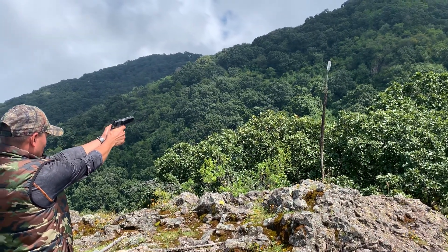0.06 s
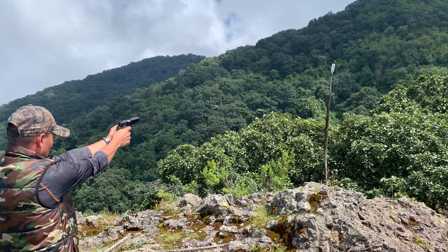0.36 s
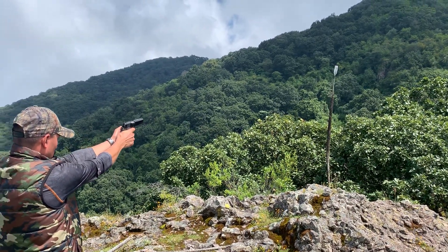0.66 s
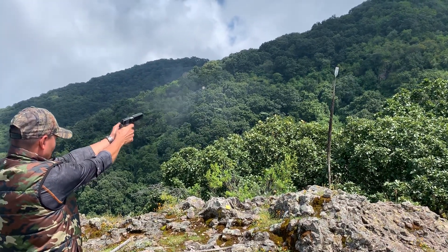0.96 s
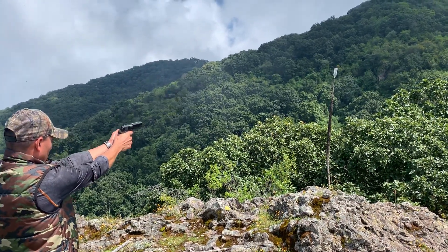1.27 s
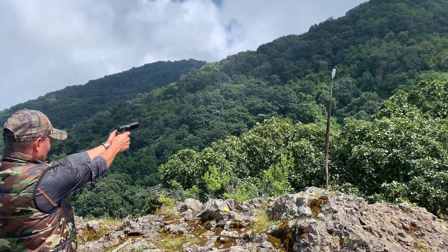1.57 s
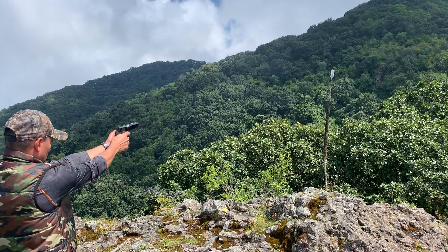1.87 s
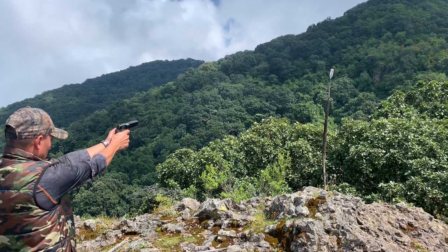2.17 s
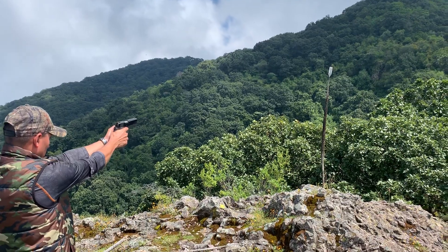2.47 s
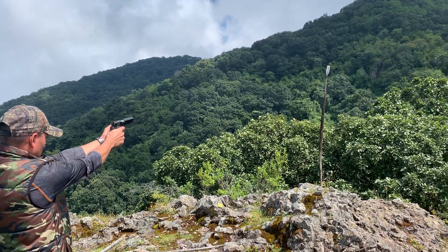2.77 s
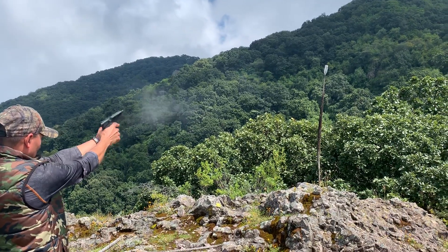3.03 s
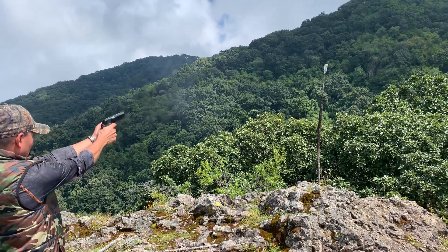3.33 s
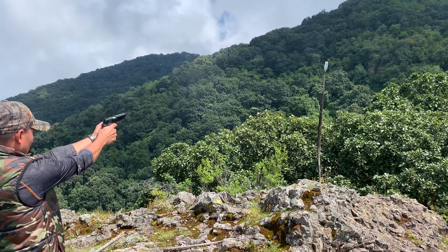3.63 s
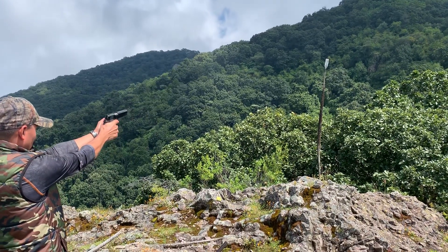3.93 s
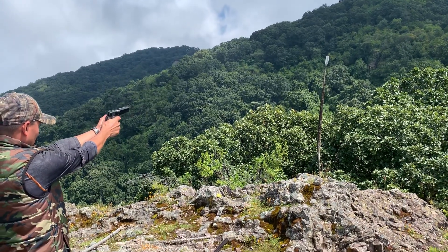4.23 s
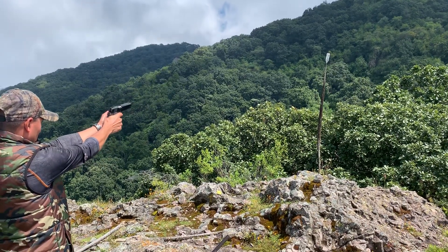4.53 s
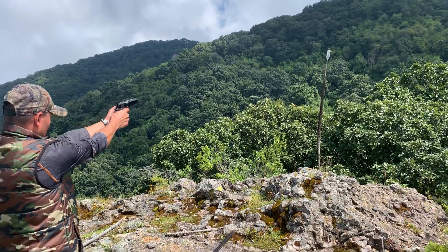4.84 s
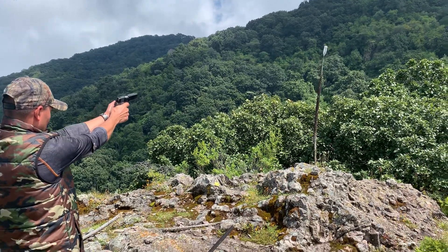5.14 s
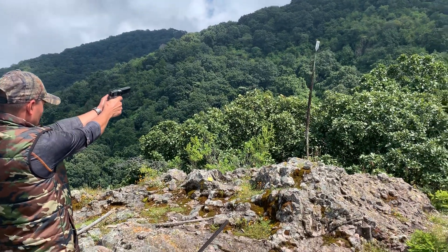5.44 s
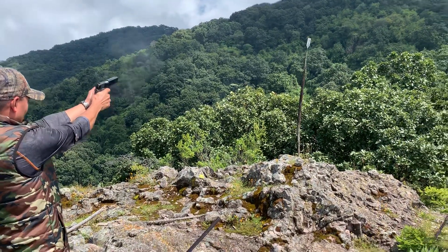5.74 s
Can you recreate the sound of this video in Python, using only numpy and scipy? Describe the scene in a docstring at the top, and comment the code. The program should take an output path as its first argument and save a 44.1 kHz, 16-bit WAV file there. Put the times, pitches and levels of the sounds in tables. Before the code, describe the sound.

Three sharp pistol shots, a couple of seconds apart, crack outdoors and echo away along wooded mountain slopes.

```python
"""Three pistol shots from a rocky ledge above a wooded valley, heard by a small two-port microphone.
Each muzzle blast is doubled by the rocks; the slide slams shut, the near trees wash the sound back,
then it rolls along the far hillside. The roll of an earlier shot is still fading at the start.
Behind: clicks of the pistol in the hands, a rustle, far knocks, valley hush, light wind on the microphone."""
import sys
import numpy as np
from scipy import signal
from scipy.fft import rfft, irfft, next_fast_len
from scipy.io import wavfile
from scipy.ndimage import uniform_filter1d

SR = 44100
rng = np.random.default_rng(int(sys.argv[2]) if len(sys.argv) > 2 else 0)


def inscribe(sig):
    """Save sig as 16-bit PCM at rate SR to the path in sys.argv[1].

    A 1-D sig is mono; a 2-D sig holds one channel per row.
    Samples are clipped to [-1, 1] before scaling.
    """
    pcm = np.round(np.clip(np.atleast_2d(sig).T, -1, 1) * 32767)
    wavfile.write(sys.argv[1], SR, pcm.astype(np.int16))


N = 264600
PREROLL_S = .06
EVENT_TIME_S = np.arange(3 * SR) / SR - PREROLL_S

# (time [s], blast gain [dB], slide [dB], near wash gain [dB], rumble [dB], roll gain [dB], roll stretch [x])
SHOTS = [(-2.15, -1.0, -20, 0, -40, -1.3, .97), (.8695, -.3, -13, .8, -38, 0, .99),
         (3.0245, -.1, -6, -1.8, -48, .3, 1.02), (5.5780, 0.2, -14, .7, -40, 0.1, 1.0)]
# per shot, blast and rock throwback: (delay [s], rise [s], fall [s], crack [dB], boom [dB], boom lag [s],
# boom rise [s], knock [dB], knock pitch [Hz], knock lag [s])
BLASTS = [
    [],
    [(0, .0022, .005, -9, -12, 0, .0042, -8, 560, .002),
     (.0265, .005, .009, -9.3, -10.3, .006, .008, -8, 780, .0105)],
    [(0, .0028, .006, -9, -11.5, .001, .006, -9, 450, .0055),
     (.0275, .0042, .0075, -7.5, -9.7, .0085, .0065, -6, 760, .0105)],
    [(0, .0034, .0058, -9, -12, .002, .0075, -8, 600, .0035),
     (.028, .005, .0085, -10.5, -11.3, .008, .009, -7.5, 680, .008)],
]
# per shot, colour as the aim shifts: (centre [Hz], width [Hz], gain [dB])
BLAST_RESONANCES = [
    [],
    [(150, 70, -4), (382, 70, 2.5), (530, 90, -3), (880, 50, -2), (1720, 100, 3), (1920, 80, -5),
     (2040, 70, 7), (3180, 50, 3), (3450, 200, -4), (4680, 250, 2), (6700, 500, -4), (8200, 600, -3)],
    [(290, 50, -3), (405, 100, 3), (540, 70, -4), (880, 50, -3), (770, 100, 1.5), (958, 70, 3),
     (1200, 160, 2.5), (1560, 150, -4), (1860, 140, -7), (2040, 70, 5), (2480, 120, 2), (3190, 50, 3),
     (4400, 250, 3), (5800, 600, -4), (10800, 1800, 3)],
    [(335, 40, 2), (580, 70, 4), (725, 100, 3), (830, 50, -4), (1330, 180, -5), (1650, 150, -3),
     (2600, 200, -2), (3100, 300, -4), (3340, 50, 4), (3850, 200, -4), (4180, 100, 3), (7600, 500, -5),
     (9300, 300, 4)],
]
WASH_RESONANCES = [
    [],
    [(1700, 200, -3), (2330, 90, 6), (2780, 150, 2), (5500, 1200, -2), (8300, 1200, 2)],
    [(900, 100, -1.5), (1120, 60, 2), (2800, 500, -2), (3800, 400, -2), (5400, 600, 2)],
    [(740, 90, 2), (1040, 70, 2), (1200, 80, -3), (1750, 120, 3), (2130, 90, 3), (3900, 220, 5),
     (5250, 200, 3)],
]
# per shot, hollow colour of the far roll: (centre [Hz], width [Hz], gain [dB])
ROLL_RESONANCES = [
    [(1800, 300, 3), (3050, 400, 6), (4300, 1200, -1)],
    [(830, 120, 2), (1600, 150, -2), (2130, 170, 4.5), (2450, 200, -3.5), (3150, 250, -3.5),
     (3680, 300, 3.5), (6500, 500, 2)],
    [(1320, 200, -2), (1820, 160, 3), (2200, 200, 1.5), (2720, 260, -4.5), (3100, 200, 2), (3340, 200, -3),
     (3620, 220, 3.5), (4000, 150, -3), (5700, 300, -3)],
    [],
]
# pistol spectra: (frequency [Hz], level [dB])
CRACK_SPECTRUM = [(300, -20), (1000, 0), (1500, -1), (2000, 1), (2700, 1.2), (4200, 0.5), (5500, -3.2),
                  (8500, -3.7), (12000, -5), (16000, -8)]
BOOM_SPECTRUM = [(60, -16), (130, -2), (200, .2), (280, -.5), (400, 1.2), (520, -2), (720, 2), (1050, -3),
                 (1250, -5.5), (1550, -14), (3000, -30)]
THUMP_SPECTRUM = [(8, -20), (22, -4), (36, -3), (48, 1), (64, -7.5), (115, -14.5), (220, -38), (500, -75)]
RUMBLE_SPECTRUM = [(8, -25), (25, -12), (38, -6), (46, 0), (58, -7), (75, -15), (110, -23), (220, -42),
                   (500, -75)]
SLIDE_SPECTRUM = [(300, -20), (1500, -5), (2500, -3), (3700, 3), (5500, -5), (8200, 0), (10000, -4),
                  (11500, 0), (16000, -7)]
GRIP_SPECTRUM = [(400, -10), (900, 0), (1800, 1), (2500, -8), (4500, -11), (7000, -22), (8500, -17),
                 (10000, -28), (16000, -40)]

# wooded slopes, one swell each: (delay [s], rise [s], relative level [dB], fade [dB/s], treble [dB])
NEAR_TREES = [(.048, .016, -24, 170, -3.5), (.085, .007, -25.5, 280, 0), (.096, .011, -24.3, 225, -1.5),
              (.13, .012, -23.5, 270, -9)]
LOWER_WOODS = [(.208, .04, -34, 104, -9), (.345, .025, -46, 88, -22)]
FAR_HILLSIDE = [(.73, .012, -60, 80, -21), (.83, .035, -59.5, 60, -19.5), (.95, .06, -60, 25, -30),
                (1.09, .04, -61, 50, -18), (1.23, .045, -58.5, 45, -13), (1.46, .09, -57, 28, -10.3),
                (1.59, .03, -57, 90, -14), (1.82, .13, -59.5, 12.5, -13.7)]
# their echo spectra: (frequency [Hz], level [dB])
TREES_SPECTRUM = [(60, -32), (150, -14), (215, -12), (275, -1), (340, -1), (410, -6.5), (470, -1.5),
                  (620, -9), (830, 3), (920, -3), (1010, -.5), (1200, -7), (1330, -6), (1440, -2),
                  (1600, -8), (1750, -4.5), (2000, -3.5), (2300, -6.5), (2550, -10.5), (3200, -13),
                  (3900, -10.5), (4800, -14), (6500, -14.5), (9500, -13), (12000, -16.5), (16000, -24)]
WOODS_SPECTRUM = [(60, -32), (150, -15), (325, 2.5), (470, -3), (600, -2), (850, 0), (1300, -6), (1500, -4),
                  (1850, -7.3), (2250, -13.3), (2800, -7), (3300, -13), (4300, -12), (5400, -15),
                  (6500, -14), (8500, -15.5), (12000, -18), (16000, -25)]
HILLSIDE_SPECTRUM = [(60, -40), (130, -12), (220, -1), (290, 3), (420, -5), (520, -5), (600, -9),
                     (790, -.3), (1020, -5), (1200, -10.5), (1380, -9.8), (1700, -15), (2150, -16.3),
                     (2800, -19), (3700, -24), (5000, -32), (6700, -41), (7700, -51), (8500, -50),
                     (16000, -76)]
# single reflections: (delay [s], level [dB])
ROCK_FACES = [(.053, -19), (.141, -21), (.217, -29), (.286, -29.5), (.396, -36), (.516, -49), (.723, -45.5),
              (1.603, -45)]
CLOSE_STONES = [(.0014, -17), (.0046, -15), (.0079, -15)]

# pistol clicks in the hands: (time [s], level [dB], fall [s])
HANDLING_CLICKS = [(.735, -72, .025), (4.733, -50.5, .009)]
# knocks across the valley: (time [s], level [dB], pitch [Hz])
FAR_KNOCKS = [(.035, -47, 700), (1.8165, -39.5, 640), (2.468, -45, 650), (4.279, -42, 760),
              (4.338, -41, 720), (4.943, -44.5, 740), (5.058, -46.5, 780), (5.12, -48, 760)]
# low noise swells from the valley: (time [s], rise [s], level [dB])
VALLEY_SWELLS = [(.275, .02, -61), (.455, .012, -59), (.545, .02, -58.5), (.74, .015, -56.5),
                 (1.49, .015, -58), (4.625, .012, -50.5), (4.72, .012, -57)]
# gusts on the microphone: (time [s], rise [s], level [dB], fade [dB/s])
GUSTS = [(1.91, .03, -60, 250), (2.09, .018, -50, 250), (2.24, .012, -50.5, 130), (2.42, .04, -61, 90),
         (2.68, .04, -57, 70), (2.81, .015, -53, 170), (3.79, .02, -63, 130)]
# background spectra: (frequency [Hz], level [dB])
RUSTLE_SPECTRUM = [(2000, -20), (4500, -3), (7000, -5), (8100, 0), (9600, 1), (11000, -10), (16000, -25)]
HUSH_SPECTRUM = [(10, -25), (60, -16), (130, -13), (280, 0), (520, -1.5), (800, -6.5), (1250, -16),
                 (2100, -27), (3000, -33), (4000, -44), (8000, -50), (16000, -54)]
SWELL_SPECTRUM = [(100, -30), (180, -12), (280, 3), (380, -3), (480, -5), (700, -15), (1500, -32),
                  (4000, -60)]
BUFFET_SPECTRUM = [(10, -12), (30, 0), (60, -2), (120, -16), (300, -42), (800, -80)]

# match of the two ports: (frequency [Hz], coherence [0-1], left minus right [dB])
PORT_MATCH = [(60, .74, .3), (200, .8, -.3), (330, .92, -1), (650, .68, 1.2), (1000, .8, -.3),
              (1900, .55, 2), (3000, .3, .3), (5700, .35, -5), (7500, .55, -.3), (9000, .92, .1),
              (16000, .9, .1)]
# earlier arrival at the right port: (frequency [Hz], lead [s])
PORT_LEAD = [(60, .0002), (330, .00006), (700, .00014), (1400, .0001), (2000, .00012), (2400, .00019),
             (5700, .00025), (9000, .000257), (16000, .00026)]
# microphone housing: (centre [Hz], width [Hz], gain [dB])
HOUSING_RESONANCES = [(345, 70, 2), (770, 120, 2.5), (880, 40, -2), (963, 60, 3), (1200, 100, -2),
                      (1420, 90, 4), (1620, 110, -1.5), (2020, 120, 3.5), (2320, 100, 2.5), (3185, 70, 4),
                      (8100, 500, 2.5)]


def pistol():
    """Per shot: blast, slide slamming shut, gas push, near wash, far roll."""
    out, near = np.zeros((2, N)), near_wash()
    for i, (at_s, blast_db, slide_db, wash_db, rumble_db, roll_db, stretch) in enumerate(SHOTS):
        blast = amp(blast_db) * ring(muzzle_blast(BLASTS[i]), BLAST_RESONANCES[i])
        clack = amp(slide_db) * slide()
        push = amp(blast_db) * gas_push(rumble_db)
        wash = amp(wash_db) * ring(near, WASH_RESONANCES[i])
        roll = amp(roll_db) * ring(far_roll(stretch), ROLL_RESONANCES[i])
        for layer in (blast, clack, push, wash, roll):
            add(out, at_s - PREROLL_S, layer)
    return out


def muzzle_blast(blasts):
    """Shock front spike, then crack, boom and knock: once direct, once off the rocks."""
    out = amp(-4) * burst(CRACK_SPECTRUM, delay_s=0, rise_s=.0002, fall_s=.0004)
    for (delay_s, rise_s, fall_s, crack_db, boom_db, boom_lag_s, boom_rise_s,
         knock_db, knock_hz, knock_lag_s) in blasts:
        crack = burst(CRACK_SPECTRUM, delay_s, rise_s, fall_s, coherence=.8)
        boom = burst(BOOM_SPECTRUM, delay_s + boom_lag_s, boom_rise_s, 1.2 * fall_s, coherence=.9)
        out += amp(crack_db) * crack + amp(boom_db) * boom
        add(out, delay_s + knock_lag_s, amp(knock_db) * knock(knock_hz))
    return out


def knock(pitch_hz, width_cycles=1.3, sag_octaves_per_cycle=.25, right_lead_s=.00013):
    """Pressure pulse smeared by its path into a few swings of falling pitch."""
    cycles = (EVENT_TIME_S[:SR // 4] + np.array([[0], [right_lead_s]])) * pitch_hz
    sag = np.log(2) * sag_octaves_per_cycle
    turns = (1 - np.exp(-sag * np.clip(cycles, -10, 10))) / sag
    return np.exp(-(cycles / width_cycles) ** 2) * np.sin(2 * np.pi * turns)


def gas_push(rumble_db, return_s=.1):
    """Low thump of the muzzle gas, one return from the trees, then a dying rumble."""
    t = EVENT_TIME_S
    direct = amp(-17.5 + swell_db(t, at_s=.022, rise_s=.012, fade_db_per_s=550, hold_s=.034))
    returned = amp(-22 + swell_db(t, return_s, rise_s=.012, fade_db_per_s=550))
    rumble = amp(rumble_db + swell_db(t, at_s=.25, rise_s=.11, fade_db_per_s=90))
    rumble *= np.clip(t / return_s, 0, 1)
    return shaped(THUMP_SPECTRUM, np.hypot(direct, returned)) + shaped(RUMBLE_SPECTRUM, rumble)


def slide():
    """Clack of the slide slamming shut after the blast."""
    return burst(SLIDE_SPECTRUM, delay_s=.0642, rise_s=.0003, fall_s=.0007)


def near_wash():
    """Echoes of the near trees, the later and darker woods below, and bare rock."""
    foliage = dict(clump_db=1.6, clumps_per_s=110, knee_hz=1450, ref_treble_db=-4)
    trees = scatter(NEAR_TREES, TREES_SPECTRUM, hollow_db=2.6, hollow_s=.04, **foliage)
    woods = scatter(LOWER_WOODS, WOODS_SPECTRUM, hollow_db=2.3, hollow_s=.1, **foliage)
    return stone_ripple(amp(4.8) * (trees + woods)) + rock_echoes()


def rock_echoes(crag_count=26, crag_db=-52, fade_db_per_s=2.5, spread_db=2):
    """Dull thuds off a few big faces and many random crags, weaker with distance."""
    out, thud = np.zeros((2, len(EVENT_TIME_S))), knock(pitch_hz=325)
    crags = [(delay_s, crag_db - fade_db_per_s * delay_s + spread_db * rng.standard_normal())
             for delay_s in rng.uniform(.3, 2.6, crag_count)]
    for delay_s, level_db in ROCK_FACES + crags:
        add(out, delay_s, amp(level_db) * thud)
    return out


def far_roll(stretch):
    """Echo travelling along the hillside from its nearest slope on."""
    nearest_s = FAR_HILLSIDE[0][0]
    slopes = [(nearest_s + stretch * (delay_s - nearest_s), *rest) for delay_s, *rest in FAR_HILLSIDE]
    roll = scatter(slopes, HILLSIDE_SPECTRUM, clump_db=2.4, clumps_per_s=60, knee_hz=1500,
                   ref_treble_db=-15, hollow_db=2.4, hollow_s=.2)
    return amp(2.4) * stone_ripple(roll)


def scatter(slopes, spectrum, clump_db, clumps_per_s, knee_hz, ref_treble_db, hollow_db, hollow_s):
    """Each slope returns a swell of small clumped echoes; longer paths through leaves lose treble."""
    hz, t, bins = signal.stft(noise(spectrum, len(EVENT_TIME_S)), SR, nperseg=256)
    hz, t = hz[:, None], t - PREROLL_S
    treble_weight = hz ** 6 / (hz ** 6 + knee_hz ** 6) * (hz / 4200) ** .42
    knots_s = np.arange(0, t[-1], 1 / clumps_per_s)
    clumps = np.interp(t, knots_s, rng.standard_normal(len(t))[:len(knots_s)])
    power = 0
    for delay_s, rise_s, level_db, fade_db_per_s, treble_db in slopes:
        dulling_db = .45 * fade_db_per_s * np.maximum(t - delay_s, 0)
        tilt_db = treble_weight * (treble_db - ref_treble_db - dulling_db)
        power += amp(level_db + swell_db(t, delay_s, rise_s, fade_db_per_s) + tilt_db) ** 2
    # overlapping paths interfere: a drifting hollow colour
    hollow_frames = max(round(hollow_s / (t[1] - t[0])), 1)
    hollow = unit_rms(uniform_filter1d(rng.standard_normal(bins.shape), hollow_frames, axis=1))
    colour_db = hollow_db * hollow * np.minimum(2 * treble_weight, 1)
    flicker_db = clump_db * clumps / (1 + treble_weight)
    bins = bins * np.sqrt(power) * amp(flicker_db + colour_db)
    return signal.istft(bins, SR, nperseg=256)[1][:, :len(EVENT_TIME_S)]


def stone_ripple(x):
    """Reflections off stones beside the microphone ripple the spectrum; rms unchanged."""
    out = x.copy()
    for delay_s, level_db in CLOSE_STONES:
        add(out, delay_s, amp(level_db) * x)
    return out * x.std() / out.std()


def handling():
    """Pistol clicking in the hands; one light, high rustle."""
    out = np.zeros((2, N))
    for at_s, level_db, fall_s in HANDLING_CLICKS:
        add(out, at_s - PREROLL_S, amp(level_db) * burst(GRIP_SPECTRUM, 0, fall_s / 20, fall_s))
    rustle = burst(RUSTLE_SPECTRUM, delay_s=0, rise_s=.008, fall_s=.02)
    add(out, .402 - PREROLL_S, amp(-77) * rustle)
    return out


def far_knocks():
    """Faint, dull knocks from across the valley."""
    out = np.zeros((2, N))
    for at_s, level_db, pitch_hz in FAR_KNOCKS:
        add(out, at_s - PREROLL_S, amp(level_db) * knock(pitch_hz))
    return out


def valley_air(hush_db=-63.5):
    """Steady hush with dull swells of low noise."""
    t = np.arange(N) / SR
    swells = sum(amp(level_db + swell_db(t, at_s, rise_s, fade_db_per_s=190))
                 for at_s, rise_s, level_db in VALLEY_SWELLS)
    return amp(hush_db) * noise(HUSH_SPECTRUM, N) + swells * noise(SWELL_SPECTRUM, N)


def wind(calm_db=-76, flutter_db=2.2, flutter_step_s=.07):
    """Soft, uneven gusts buffeting the microphone."""
    t = np.arange(N) / SR
    knots_s = np.arange(0, t[-1], flutter_step_s)
    flutter = amp(flutter_db * np.interp(t, knots_s, rng.standard_normal(len(knots_s))))
    gusts = sum(amp(level_db + swell_db(t, at_s, rise_s, fade_db_per_s))
                for at_s, rise_s, level_db, fade_db_per_s in GUSTS)
    return (amp(calm_db) + gusts) * flutter * noise(BUFFET_SPECTRUM, N)


def noise(spectrum, size, coherence=1):
    """Coloured noise at the two ports, rms 1; the right port leads."""
    hz = np.fft.rfftfreq(size, 1 / SR)
    left, independent = np.exp(2j * np.pi * rng.random((2, len(hz))))
    shared = np.clip(coherence * lookup(PORT_MATCH, hz), 0, 1)
    right = shared * left + np.sqrt(1 - shared ** 2) * independent
    right *= np.exp(2j * np.pi * hz * lookup(PORT_LEAD, hz))
    balance = amp(lookup(PORT_MATCH, hz, column=2) / 2)
    bins = np.array([left * balance, right / balance]) * amp(lookup(spectrum, hz))
    return unit_rms(irfft(bins, size))


def shaped(spectrum, envelope, coherence=1):
    """Noise under an envelope, scaled to the envelope's energy."""
    return unit_rms(noise(spectrum, len(envelope), coherence) * envelope) * np.sqrt(np.mean(envelope ** 2))


def burst(spectrum, delay_s, rise_s, fall_s, coherence=1):
    """Noise burst, exponential rise and fall, peak at delay_s."""
    t = EVENT_TIME_S[:SR // 4] - delay_s
    return shaped(spectrum, np.exp(np.minimum(t / rise_s, -t / fall_s)), coherence)


def swell_db(t, at_s, rise_s, fade_db_per_s, hold_s=0):
    """Gaussian rise to 0 dB, hold, steady fade."""
    early_s, late_s = np.minimum(t - at_s, 0), np.maximum(t - at_s - hold_s, 0)
    return -10 / np.log(10) * (early_s / rise_s) ** 2 - fade_db_per_s * late_s


def ring(x, resonances):
    """Ringing peaks and dips, one pole each."""
    size = next_fast_len(x.shape[1] + SR // 10)
    hz, bins = np.fft.rfftfreq(size, 1 / SR), rfft(x, size)
    for centre_hz, width_hz, gain_db in resonances:
        bins *= 1 + (amp(gain_db) - 1) / (1 + 2j * (hz - centre_hz) / width_hz)
    return irfft(bins, size)[:, :x.shape[1]]


def add(mix, at_s, sound):
    """Mix in place; at_s may be negative."""
    start = round(at_s * SR)
    sound = sound[:, max(-start, 0):]
    part = mix[:, max(start, 0):][:, :sound.shape[1]]
    part += sound[:, :part.shape[1]]


def lookup(table, hz, column=1):
    """Table column interpolated over log frequency."""
    columns = np.transpose(table)
    return np.interp(np.log(hz + 1), np.log(columns[0] + 1), columns[column])


def amp(db):
    return 10 ** (np.asarray(db) / 20)


def unit_rms(x):
    return x / np.sqrt(np.mean(x ** 2) + 1e-20)


def scene():
    return pistol() + handling() + far_knocks() + valley_air() + wind()


def record(dry):
    """Housing resonances, soft clipping, band limit."""
    coloured = ring(dry, HOUSING_RESONANCES)
    ceiling, edge_hz = amp(1.5), 15950
    rounded = ceiling * np.tanh(amp(-.8) * coloured / ceiling)
    lowpass = signal.firwin(511, edge_hz, window=("kaiser", 9), fs=SR)
    return signal.oaconvolve(rounded, lowpass[None], "same")


dry = scene()
out = record(dry)
inscribe(out)
```